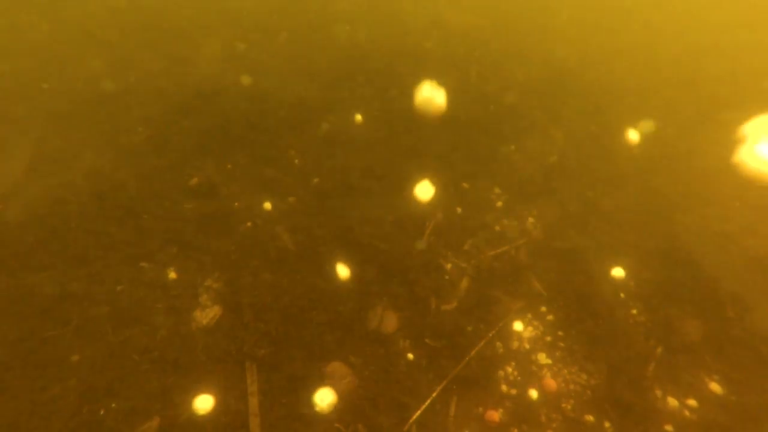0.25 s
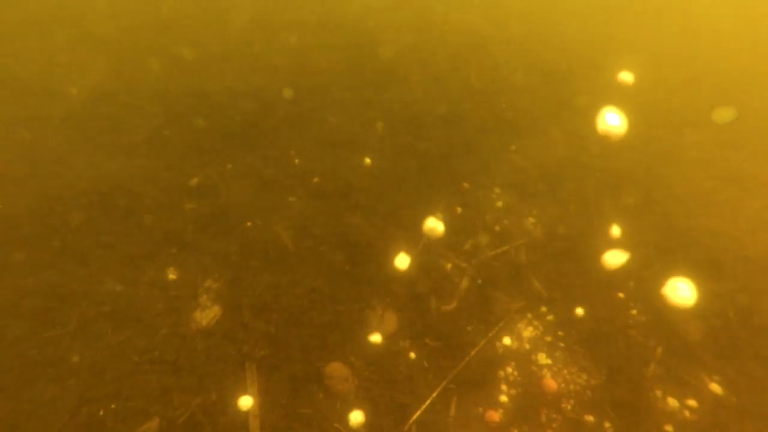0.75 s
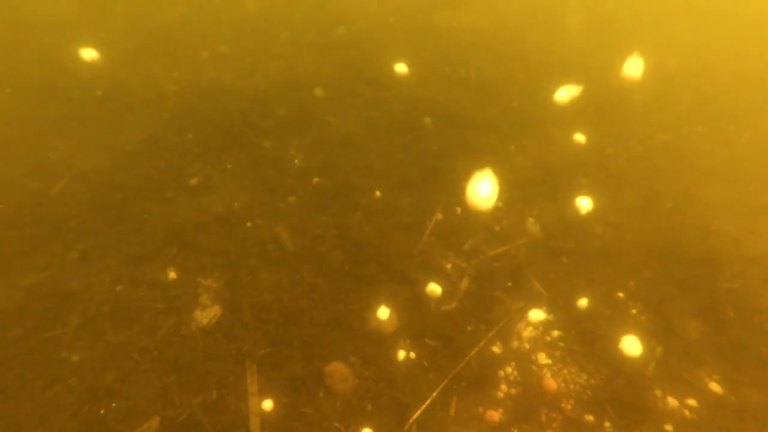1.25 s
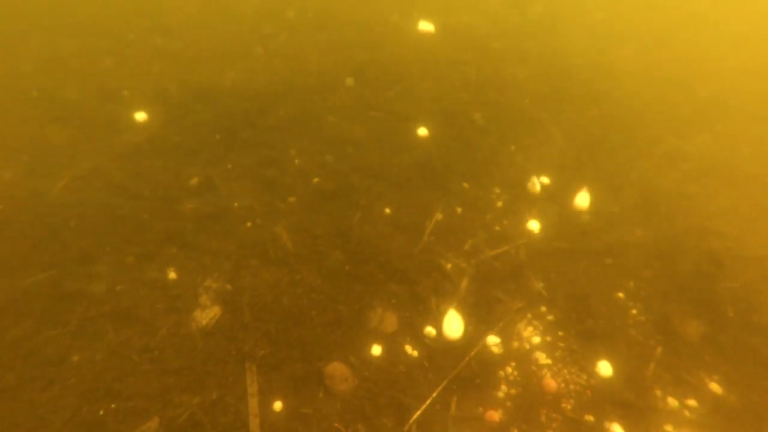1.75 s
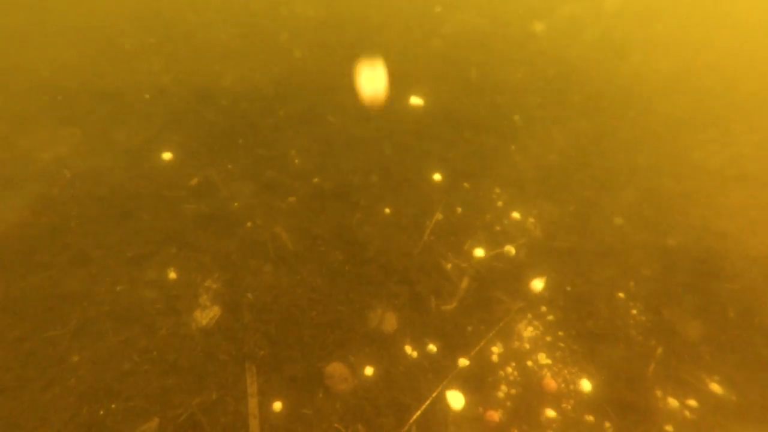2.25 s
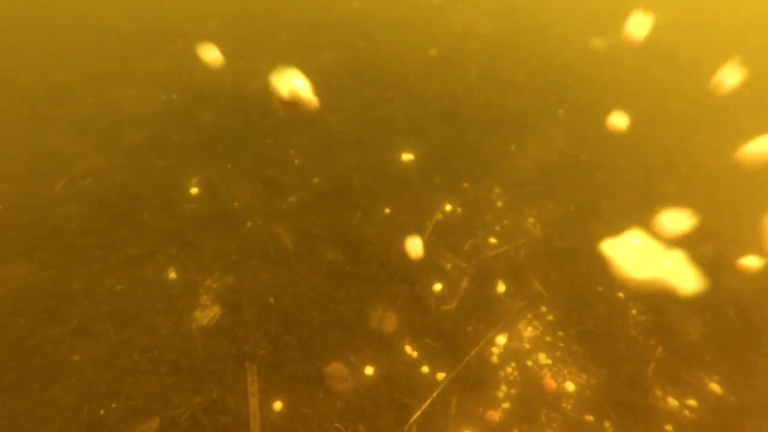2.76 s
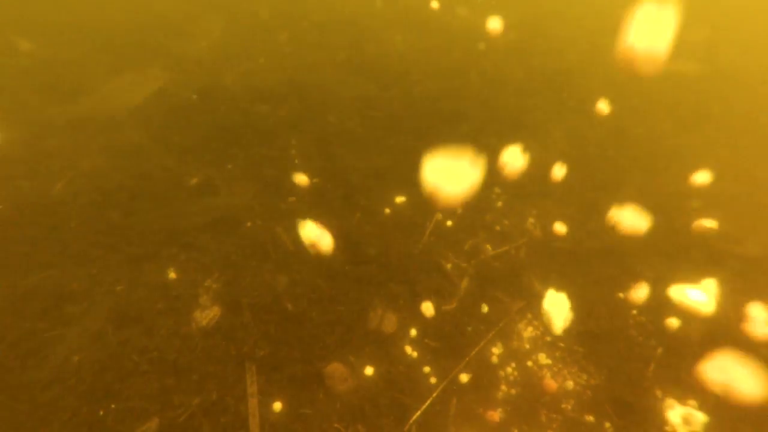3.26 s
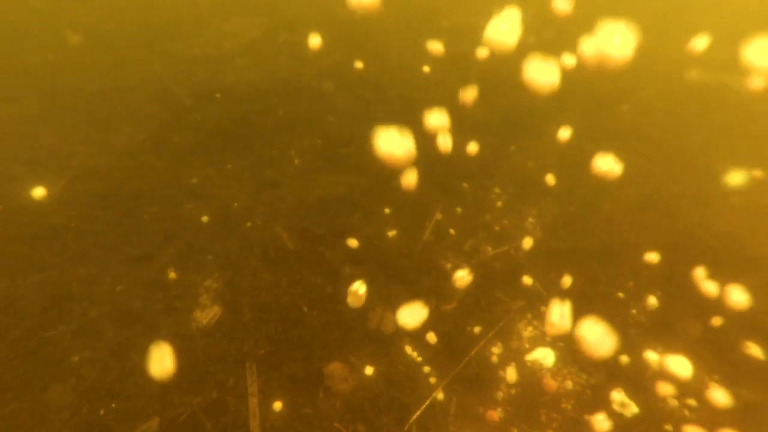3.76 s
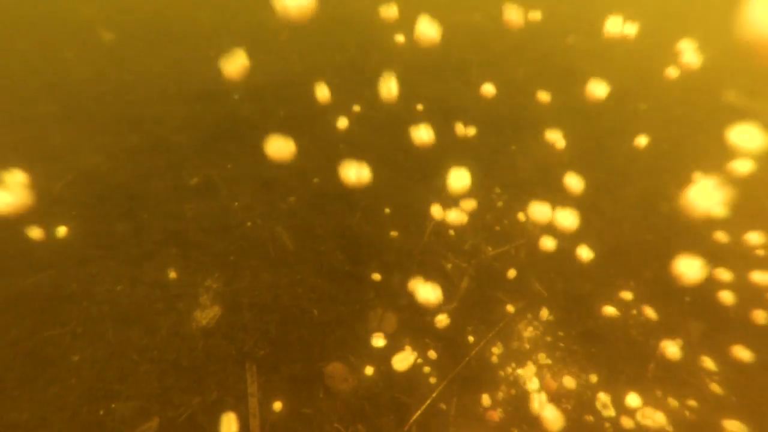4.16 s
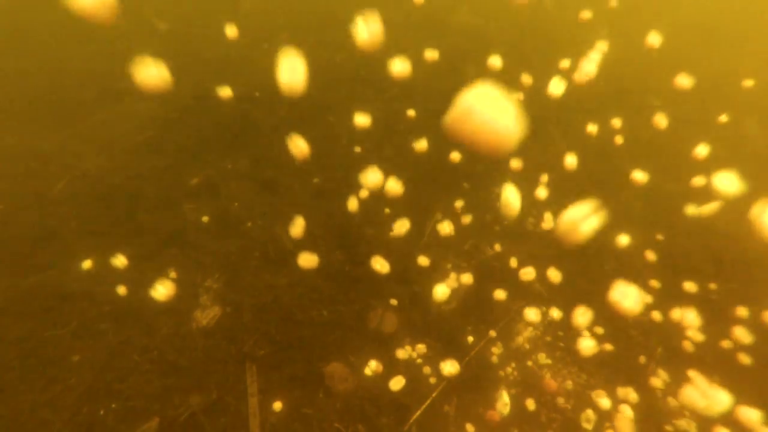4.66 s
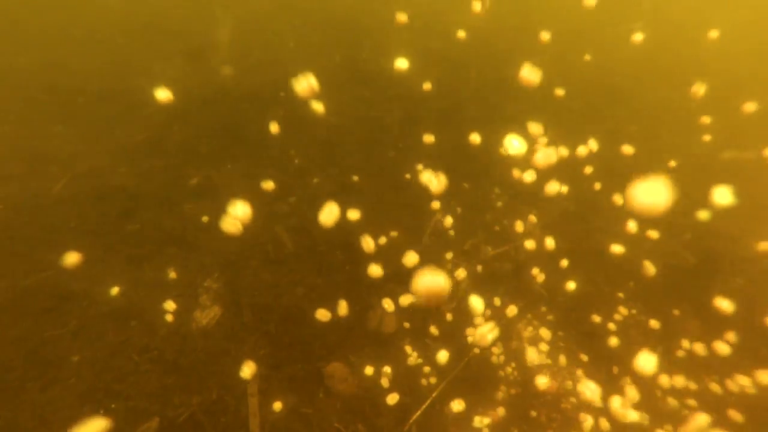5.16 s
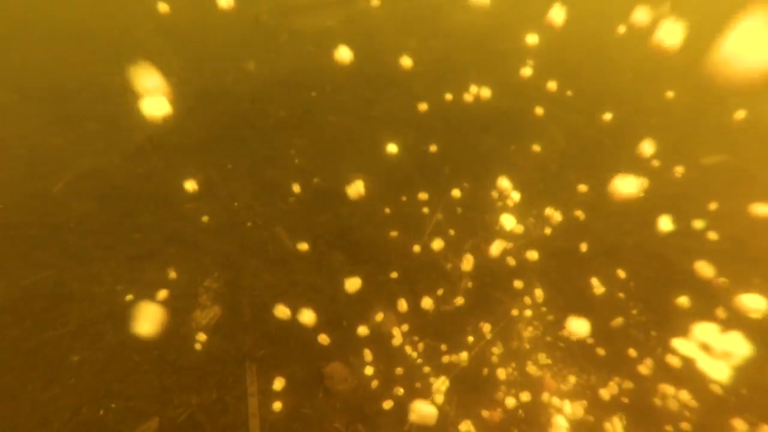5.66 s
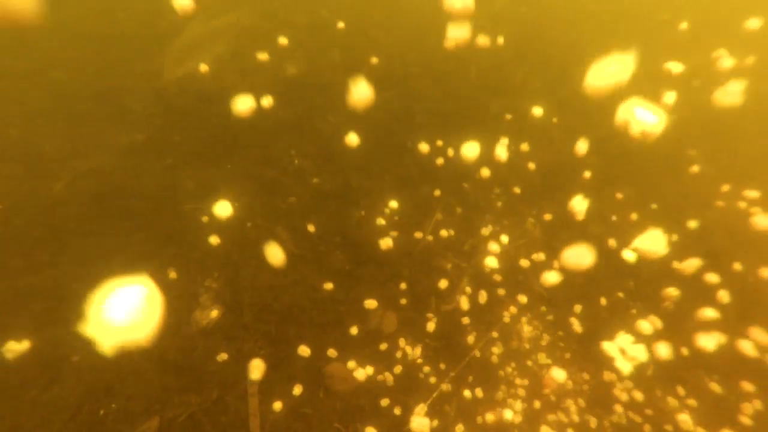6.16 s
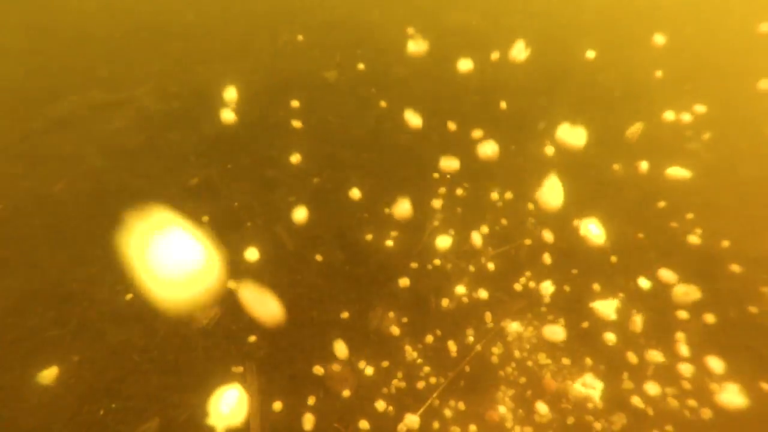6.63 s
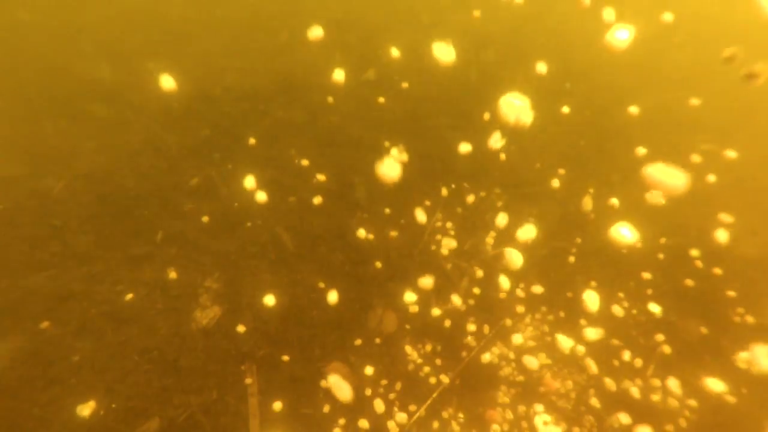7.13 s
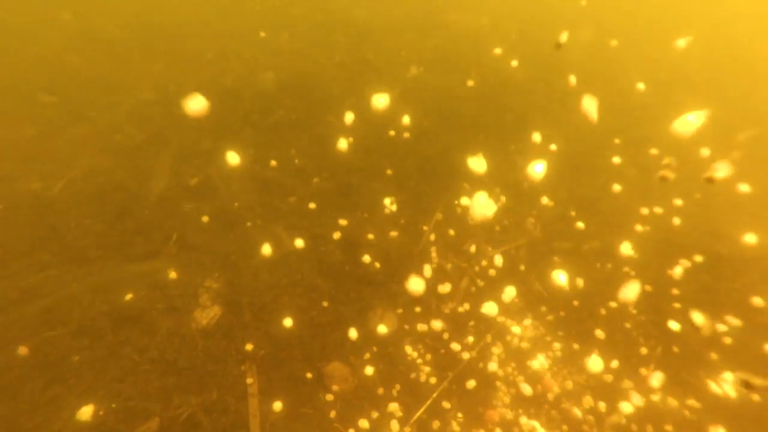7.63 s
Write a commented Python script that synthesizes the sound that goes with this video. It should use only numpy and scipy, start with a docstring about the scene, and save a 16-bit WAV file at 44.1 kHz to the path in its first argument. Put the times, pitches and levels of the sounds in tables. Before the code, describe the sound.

A faint, steady underwater hiss runs throughout, heard from a camera housing on a lake bed. A few light ticks and a small bubble blip come first, then a sharper tap with a soft thud at 1.4 seconds. At about 1.6 seconds a handful of grain hits the surface in a short, muffled, crackling splash full of ringing bubbles, gone by 2 seconds. From about 2.5 seconds sinking grains click and tick irregularly against the housing, close and uneven in strength, with occasional bubble blips and faint low bumps as it rocks. A clear tap comes at 4.4 seconds, the sharpest knock at 5 seconds and another at 5.3. At about 6.5 seconds a second handful splashes in, with slightly louder bubbling, fading by 7 seconds. A few more taps follow at around 7.7 seconds over the hiss.

```python
"""On a lake bed lies a camera in a waterproof housing, while grain is thrown in above it.
Two handfuls break the surface in bursts of ringing bubbles. Sinking grains tap the housing,
which rings and rocks on its mount. One microphone hears it all over a steady hiss,
and each of the two channels adds a little hiss of its own."""
import sys
import numpy as np
from scipy import signal
from scipy.fft import rfft, irfft, next_fast_len
from scipy.io import wavfile
from scipy.ndimage import uniform_filter1d

SR = 44100
rng = np.random.default_rng(int(sys.argv[2]) if len(sys.argv) > 2 else 0)


def inscribe(sig):
    """Save sig as 16-bit PCM at rate SR to the path in sys.argv[1].

    A 1-D sig is mono; a 2-D sig holds one channel per row.
    Samples are clipped to [-1, 1] before scaling.
    """
    pcm = np.round(np.clip(np.atleast_2d(sig).T, -1, 1) * 32767)
    wavfile.write(sys.argv[1], SR, pcm.astype(np.int16))


N = 347949


def undb(db):
    return 10 ** (np.asarray(db) / 20)


def level(x, db):
    """Scale a sound to an average (RMS) level of db."""
    return x * undb(db) / np.sqrt(np.mean(x ** 2))


def fade(t, ring_s):
    """Falls by 60 dB in ring_s, the ring time."""
    return 1000 ** (-t / ring_s)


def ring(kicks, hz, ring_s):
    """Each kick starts a pure tone that dies away."""
    pole = np.exp(2j * np.pi * hz / SR - np.log(1000) / (ring_s * SR))
    return signal.lfilter([1], [1, -pole], kicks).imag


def band(x, hz, width):
    """Keep mostly the sound near one pitch."""
    return signal.lfilter(*signal.iirpeak(hz, hz / width, SR), x)


def shaped_noise(points):
    """Noise whose spectrum follows (f/Hz, level/dB) points."""
    hz, db = np.transpose(points)
    size = next_fast_len(N)
    f = np.maximum(np.arange(size // 2 + 1) * SR / size, 1)
    gain = undb(np.interp(np.log(f), np.log(hz), db))
    return irfft(rfft(rng.standard_normal(size)) * gain, size)[:N]


def wander(per_s):
    """A smooth random curve, mostly between -1 and 1."""
    hold = int(SR / per_s)
    steps = np.repeat(rng.standard_normal(N // hold + 1), hold)
    return 1.3 * uniform_filter1d(uniform_filter1d(steps, hold), hold)[:N]


def add(out, start, sound):
    """Mix a sound in at start seconds."""
    i = int(start * SR)
    out[i:i + len(sound)] += sound[:N - i]


# Noise of the water and microphone: f/Hz, relative level/dB
WATER_NOISE = [(12, -45.5), (20, -3), (50, 5), (174, -2), (313, -5), (436, -7.5), (739, -10), (976, -13.5),
               (11200, -24), (14000, -26), (15300, -27.5)]
# Noise of the channels: f/Hz, relative level/dB
CHANNEL_NOISE = [(100, 3.5), (1000, 10.5), (5000, 12), (12000, 9.5), (15000, 3.5)]
# Whine of the electronics: f/Hz, width/Hz, level/dB
WHINE_TONES = [(11065, 50, -96), (11290, 45, -98)]

def hiss(water_db=-63.5, channel_db=-77):
    """Water, microphone and a faint whine sound alike in both channels; channel noise sets them apart."""
    common = level(shaped_noise(WATER_NOISE), water_db) * undb(.5 * wander(1))
    for hz, width, db in WHINE_TONES:
        whine = level(band(rng.standard_normal(N), hz, width), db)
        common += whine * undb(1.5 * wander(10))
    apart = level(shaped_noise(CHANNEL_NOISE), channel_db)
    return np.array([common + apart, common - apart])


def grit(per_s=97, spread_db=2.5, db=-79.5):
    """Fine crumbs tick faintly all the time on the four lowest-pitched parts of the housing."""
    hits = rng.random(N) < per_s / SR
    sizes = undb(spread_db * np.minimum(rng.exponential(size=N), 2.5))
    kicks = uniform_filter1d(hits * sizes, size=20)  # soft contact
    ticks = sum(ring(kicks, hz, ring_s) for part in HOUSING_TONES[:4] for hz, _, ring_s in part)
    return level(ticks, db)


# Jolts to the housing: t/s, swing strength/dB, thud strength/dB
JOLTS = [(0.068, -55, -81), (0.461, -38, -68), (1.4, -38, -44.5), (1.66, -51, -82), (1.764, -48, -60.5),
         (2.713, -65, -52.5), (2.915, -45.5, -75), (3.04, -55, -76), (3.487, -50, -69), (3.876, -53.5, -54),
         (4.128, -53, -64), (4.299, -53, -69), (4.492, -57, -55.5), (4.999, -37, -46), (5.259, -47, -59),
         (5.351, -56.5, -56), (5.673, -51, -59), (6.001, -62, -55), (7.109, -54, -67), (7.468, -60, -63),
         (7.784, -50.5, -60)]
# Tones of the mount's thud: f/Hz, relative level/dB, ring time/s
MOUNT_TONES = [(100, 3, 0.091), (152, 7.5, .04), (211.3, 5, 0.081)]

def rocking(rock_hz=31.7, ring_s=.43, grow_s=.033, current_db=-67.5):
    """Each jolt makes the housing thud and swing on its mount; the current keeps it stirring."""
    swings, kicks = np.zeros(N), np.zeros(N)
    t = np.arange(SR // 2) / SR
    swing = (fade(t, ring_s) - fade(t, grow_s)) * np.sin(2 * np.pi * rock_hz * t)
    for start, swing_db, thud_db in JOLTS:
        add(swings, start, undb(swing_db) * swing)
        kicks[int(start * SR)] = undb(thud_db)
    current = level(band(rng.standard_normal(N), rock_hz, width=20), current_db)
    thuds = sum(undb(db) * ring(kicks, hz, thud_s) for hz, db, thud_s in MOUNT_TONES)
    return swings + current + thuds


def pops(per_s=750, spread_db=7):
    """Tiny clicks of uneven size at random times."""
    sizes = undb(spread_db * np.minimum(rng.exponential(size=N), 3.5))
    hits = rng.random(N) < per_s / SR
    return hits * sizes * rng.choice([-1, 1], N)


def handful_gain(start, patter_s, db, rise_s=.025):
    """One handful gets loud fast, sags while it patters, then fades out."""
    t = np.arange(N) / SR - start - rise_s
    rise_db = 904 * t  # slopes in dB per second
    fall_db = -23.5 * t - 242 * np.maximum(t - patter_s, 0)
    return undb(db + np.minimum(rise_db, fall_db))


# Handfuls hitting the surface: t/s, patter length/s, peak gain/dB
HANDFULS = [(1.556, 0.15, -57), (6.51, 0.16, -56)]
# Where the housing walls ring in a splash: f/Hz, width/Hz, relative level/dB
WALL_BANDS = [(724, 380, 11.5), (1280, 220, -2.5), (1730, 420, 8), (2210, 140, 4.5), (2770, 650, -1),
              (3330, 750, 0.5), (4670, 720, -18)]

def splashes(impact_gain=.26):
    """Grain impacts shake all the walls at once; tiny bubbles shake only those near their own pitch."""
    impacts = impact_gain * pops()
    walls = np.zeros(N)
    for hz, width, db in WALL_BANDS:
        patter = impacts + pops()  # fresh pops are this band's bubbles
        for pass_width in (width, width, 2 * width):
            patter = band(patter, hz, pass_width)
        walls += level(patter, db)
    return walls * sum(handful_gain(*row) for row in HANDFULS)


# Bubbles that stand out: t/s, level/dB, f/Hz, ring time/s
CLEAR_BUBBLES = [(.325, -57.5, 780, 0.069), (0.433, -35.5, 782, 0.034), (1.144, -45.5, 930, .017),
                 (1.5879, -21, 740, 0.012), (1.588, -16.5, 1650, .011), (1.5994, -42, 3700, 0.017),
                 (1.591, -36, 1474, 0.045), (1.6036, -31, 2160, .013), (1.605, -30, 1865, 0.047),
                 (1.6146, -37.5, 819, 0.21), (1.6333, -28, 746, 0.021), (1.6376, -40, 3500, .015),
                 (1.6404, -39, 1680, 0.11), (1.6475, -40, 734, 0.063), (1.6561, -27, 627, .049),
                 (1.6672, -24.5, 888, 0.059), (1.6703, -29, 3400, 0.012), (1.6835, -36.5, 1910, .049),
                 (1.697, -38, 980, 0.074), (1.7139, -44, 882, 0.23), (1.713, -44, 3160, .013),
                 (1.731, -47, 2950, 0.014), (1.738, -30, 1730, 0.06), (1.7482, -36, 796, 0.16),
                 (1.7508, -30.5, 1885, 0.043), (1.7777, -36, 1670, 0.048), (1.815, -45, 1740, .079),
                 (1.858, -42, 2180, 0.044), (1.966, -47, 2030, 0.034), (2.5387, -54, 744, 0.075),
                 (2.6253, -50, 727, 0.13), (3.0782, -40, 674, 0.036), (3.6017, -44, 790, 0.046),
                 (3.622, -34, 715, .013), (3.7247, -49, 908, 0.046), (4.1478, -35.5, 860, 0.033),
                 (4.2351, -42.5, 2150, 0.013), (4.237, -54, 785, 0.14), (6.344, -50, 332, 0.086),
                 (6.375, -53, 780, 0.11), (6.5, -50.5, 720, 0.098), (6.528, -38, 3400, .015),
                 (6.5345, -47, 1820, 0.075), (6.536, -27.5, 844, 0.03), (6.5577, -20, 780, 0.057),
                 (6.567, -31.5, 3380, 0.013), (6.5672, -27.5, 1680, .029), (6.5775, -16, 937, 0.072),
                 (6.5846, -33, 1575, .053), (6.601, -29, 1670, 0.037), (6.6128, -13, 890, .05),
                 (6.6144, -31, 2690, 0.016), (6.616, -23, 1810, 0.014), (6.6323, -27.5, 950, 0.035),
                 (6.636, -29, 1650, .036), (6.644, -27, 1893, 0.043), (6.6526, -22, 3130, 0.0098),
                 (6.6735, -29, 3470, 0.007), (6.683, -29, 950, 0.025), (6.69, -30.5, 1630, 0.057),
                 (6.6683, -41.5, 1850, 0.14), (6.697, -38, 3490, .018), (6.7068, -22, 2120, 0.011),
                 (6.73, -39, 3130, 0.014), (6.7427, -30, 1606, 0.06), (6.755, -33.5, 3400, 0.018),
                 (6.822, -36.5, 1860, 0.036), (6.937, -33, 2030, 0.015)]

def bubbles(rise_s=.0015, glide=.055, wobble_db=1.9):
    """A bubble pinches off and rings, its pitch climbing as it dies, unsteady among its neighbours."""
    out = np.zeros(N)
    for start, db, hz, ring_s in CLEAR_BUBBLES:
        t = np.arange(int(1.174 * ring_s * SR)) / SR
        tone = np.sin(2 * np.pi * hz * (t + glide * t * (t / ring_s - .3)))
        wobble = np.interp(t, np.arange(100) * .004, rng.standard_normal(100))
        envelope = (1 - np.exp(-t / rise_s)) * fade(t, ring_s)
        add(out, start, undb(db + wobble_db * wobble) * envelope * tone)
    return out


# Tones of the housing: f/Hz, relative level/dB, ring time/s
# One list per part: base, back, then the walls (side, face, corners, lens port, rim, latch).
HOUSING_TONES = [
    [(338.8, 0, 0.086), (281, -1, 0.04), (410, 2, 0.02)],
    [(565.3, 2, 0.08), (620, -3.5, 0.073)],
    [(469, -21.5, .02), (667, 0.5, 0.034), (779, 5.5, 0.024)],
    [(920, -7.5, 0.022), (1026, 0, 0.019), (1217, -4, 0.016), (1310, -6.5, 0.029)],
    [(1507, 0.5, 0.013), (1809, -3, 0.014), (2064, -7.5, 0.016), (2474, -11.5, 0.013)],
    [(2830, -5.5, 0.0086), (3347, -0.5, 0.01)],
    [(4070, 2, 0.0055), (4700, 1.5, 0.0047), (5600, 6, 0.0038), (6800, -2, 0.0066)],
    [(9100, 6.5, 0.0036), (10500, 13.5, .004), (12000, 9.5, 0.0087), (13130, -2.5, 0.0041)],
]
# Grains landing: t/s, strength/dB, place (0 side, 1 face, 2 corners, 3 lens port),
# softness/dB lost per part away from that place, base thump/dB, back thump/dB,
# ring time factor (1 for a clean bounce, less when a soft grain stays in contact)
GRAIN_TAPS = [(.1776, -64, 0, 6, -60, -58.5, 0.59), (.5116, -46.5, 1.4, 12, -60, -57, 2),
              (.8569, -45, 0.8, 9, -47.5, -49.5, 1.55), (.8625, -45, 0.9, 8, -74, -68, 0.91),
              (.9765, -57, 2.5, 11, -65, -60, 1.16), (1.4004, -19, 1, 13, -36, -45, 1.06),
              (1.4814, -58.5, 0, 6, -57.5, -63, 1.6), (1.6995, -56, -8, 8, -48.5, -52, 2.5),
              (1.776, -43, 1.95, 8, -50, -68, 1.2), (1.8559, -39, 1.3, 9, -47.5, -49.5, 1.54),
              (1.919, -52.5, 2.5, 8, -78, -76, 2.1), (1.9415, -55, .5, 8, -80, -80, 1.3),
              (2.2363, -63, 1.5, 6, -58.5, -66, 2.7), (2.4598, -50.5, 1.2, 12, -80, -80, .97),
              (2.6944, -45.5, 1.3, 7, -52, -73, 1.4), (2.7124, -35.5, 1.32, 12, -44, -75, 1.84),
              (2.8314, -55, .6, 7, -59, -80, 1), (2.9119, -35, 0.95, 4.5, -44, -48.5, 1.23),
              (3.031, -49, 0.5, 6, -65, -67, 0.85), (3.1165, -65, 0, 7, -58.5, -66, 1.8),
              (3.1928, -48, 0.5, 7, -61, -76, 0.65), (3.242, -33.5, 0.9, 7, -52, -50, 0.54),
              (3.3396, -27, 1.4, 8, -57, -59, 0.56), (3.4146, -48.5, 1, 8, -49.5, -57.5, 1.5),
              (3.5308, -56.5, 1, 3.5, -61, -80, 1.3), (3.5519, -47, .5, 7, -58, -58, 1.1),
              (3.6545, -53, 0.9, 5, -65, -66, 1.5), (3.6986, -68, .5, 4, -57.5, -64, 1.3),
              (3.8065, -63, 0.5, 7, -55.5, -58, 2.5), (3.8612, -35, 0.8, 4, -46, -46, 0.68),
              (3.8746, -34.5, 1.72, 8, -48, -80, 1.3), (3.9092, -51, 1, 4.5, -47.5, -57.5, 1.5),
              (4.0148, -38, 1, 8, -51, -49.5, 1.02), (4.1091, -53, 0.6, 7, -54, -62, 1.7),
              (4.1364, -42, 0.6, 9, -50, -66, 1.4), (4.1768, -57, 3, 4.5, -50.5, -61, 1),
              (4.2216, -52, 1.1, 9, -53, -64, 1.6), (4.2648, -45, 1.5, 8, -60, -43.5, 1.1),
              (4.4172, -18.5, .7, 12, -38, -34.5, 0.39), (4.4855, -42, 1.1, 5, -74, -67, 0.52),
              (4.4916, -39, 0.3, 12, -41, -48, 0.71), (4.6348, -80, 3, 5, -56, -68, 1.2),
              (4.6677, -46, 1.2, 9, -50, -56, 0.86), (4.8304, -51, 1.3, 4, -45, -48.5, 1.36),
              (4.8855, -52, 0.5, 4.5, -41, -35, 1.13), (4.9822, -50.5, -0.7, 6, -51, -57.5, 1.2),
              (4.9975, -2.5, 1.33, 12.85, -31, -24.5, 0.91), (5.0527, -37.5, 1.3, 9, -42, -55, 1.4),
              (5.1853, -43, 1, 8, -44, -57, 1.22), (5.2561, -47.5, 0.8, 7, -50.5, -53.5, 1.5),
              (5.2964, -44.5, 1.05, 9, -56, -64, 1), (5.3491, -9.5, 2, 11.4, -40, -37, 0.69),
              (5.3765, -40, 1.05, 4, -44, -53.5, 1.4), (5.4903, -34.5, 1.1, 10, -80, -48, 0.5),
              (5.6763, -45.5, 1, 3, -39.5, -43.5, 1.48), (5.9845, -46, 3, 8, -66, -59, .72),
              (5.9987, -26.5, 0, 5.5, -35.5, -36, 0.37), (6.0135, -28.5, 1.5, 18, -46, -37, 0.25),
              (6.3225, -30.5, 1.17, 13, -36.5, -70, 1.17), (6.7437, -29.5, 1.73, 9, -71, -67, 0.71),
              (6.9336, -45, 2, 7, -47.5, -67, 1.04), (7.1083, -70, 2.2, 6, -57, -71, 4),
              (7.4873, -53, 1.3, 4, -80, -70, .93), (7.5066, -60, 3.5, 11, -53, -60, 1.5),
              (7.6208, -50.5, 0.7, 9, -60, -64, 0.78), (7.66, -24.5, 1.31, 11, -47.5, -55, 0.96),
              (7.7807, -29.5, 1.34, 6, -47.5, -51, 1.04), (7.8095, -41, 0.5, 6.5, -63, -77, 0.74)]

def grain_taps(spot_db=2.38, detune=.057, far_loss_db=1.85, build_s=.0035):
    """Each grain sets the whole housing ringing; where it lands shifts the tones' balance and pitch."""
    part_of_tone = np.concatenate([[k] * len(part) for k, part in enumerate(HOUSING_TONES)])
    hz, db, ring_s = np.concatenate(HOUSING_TONES).T[:, :, None]
    t = np.arange(SR // 7) / SR
    signs = (-1) ** np.arange(len(hz))[:, None]
    cushion = (1 - fade(t, build_s)) ** 2  # water softens the first contact
    out = np.zeros(N)
    for start, strength, place, softness, base_db, back_db, ring_factor in GRAIN_TAPS:
        level_shift, pitch_shift = rng.standard_normal((2, len(hz), 1))
        away = np.abs(np.arange(len(HOUSING_TONES) - 2) - place)
        walls_db = strength - softness * away - far_loss_db * np.maximum(away - 1, 0) ** 2
        kick_db = np.array([base_db, back_db, *walls_db])[part_of_tone, None]
        sizes = signs * undb(kick_db + db + spot_db * level_shift)
        pitch = hz * (1 + detune * pitch_shift * np.minimum(hz / 1000, 1))  # low tones shift less
        tones = sizes * fade(t, ring_s * ring_factor) * np.sin(2 * np.pi * pitch * t)
        add(out, start, tones.sum(axis=0) * cushion)
    return out


def scene():
    """Everything the microphone hears, in two channels."""
    return grain_taps() + bubbles() + splashes() + rocking() + grit() + hiss()


def record(dry, top_hz=15350):
    """The camera cuts off the highest treble."""
    return signal.sosfilt(signal.ellip(10, .2, 60, top_hz, fs=SR, output="sos"), dry)


dry = scene()
out = record(dry)
inscribe(out)
```